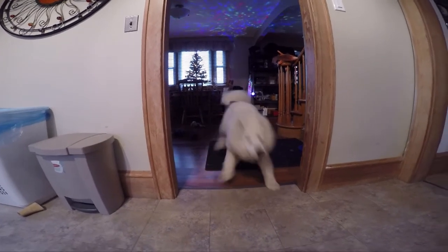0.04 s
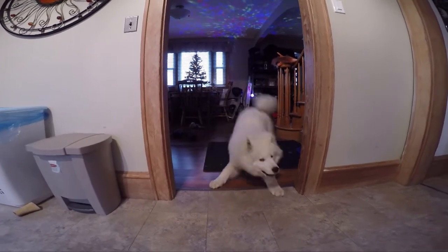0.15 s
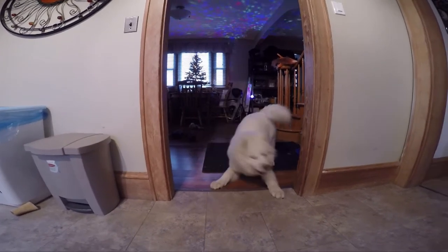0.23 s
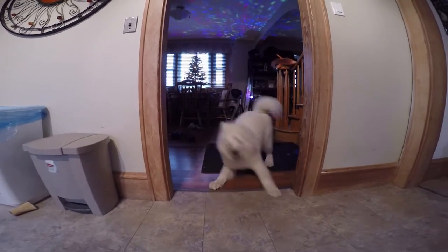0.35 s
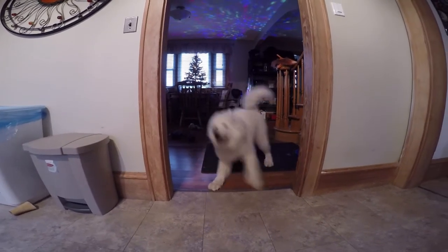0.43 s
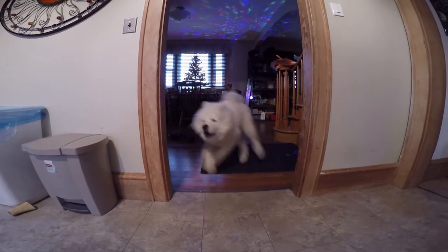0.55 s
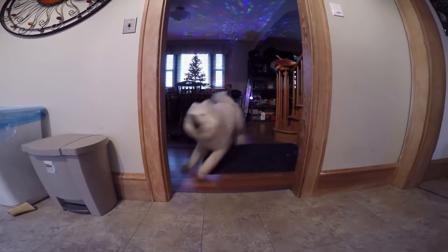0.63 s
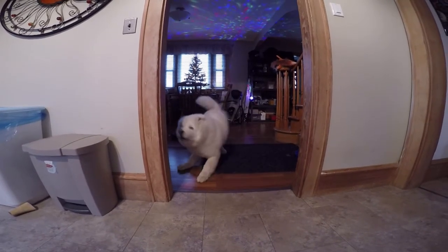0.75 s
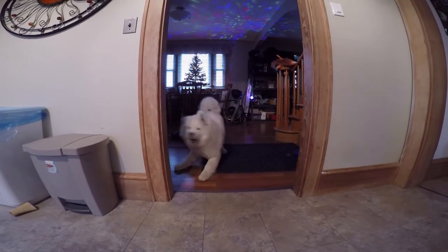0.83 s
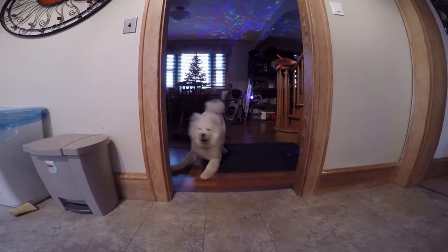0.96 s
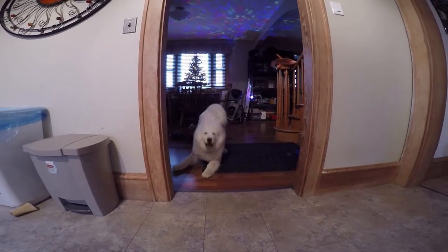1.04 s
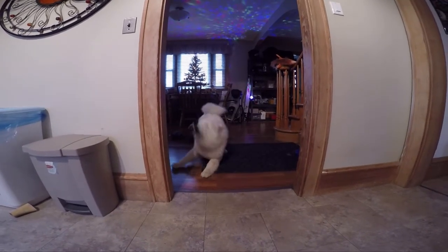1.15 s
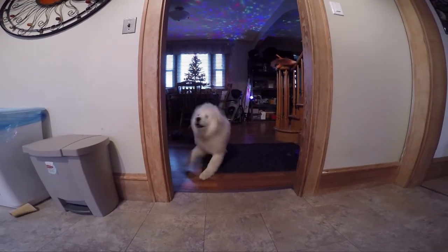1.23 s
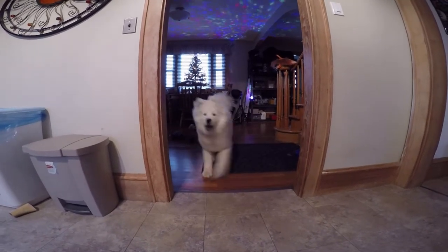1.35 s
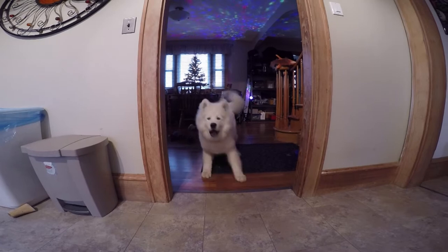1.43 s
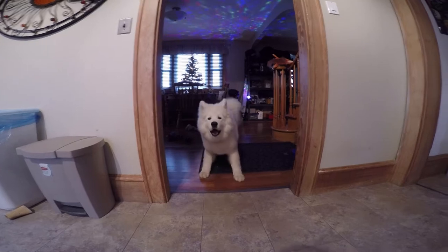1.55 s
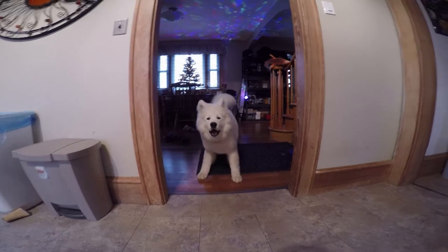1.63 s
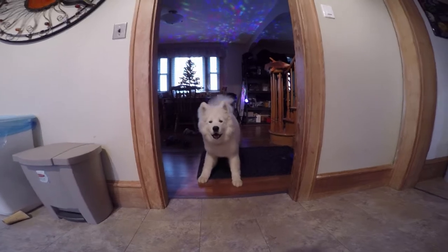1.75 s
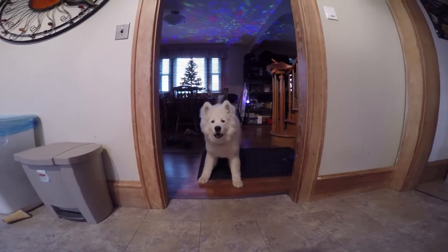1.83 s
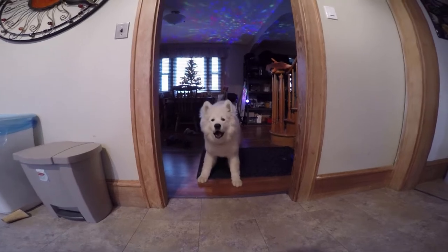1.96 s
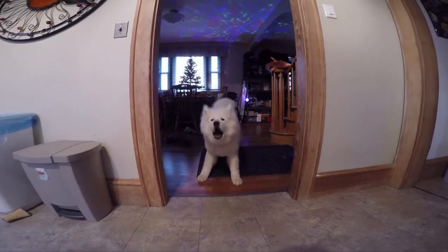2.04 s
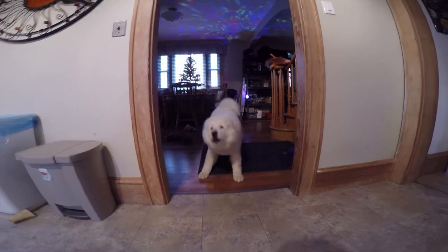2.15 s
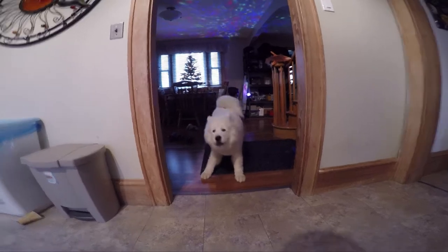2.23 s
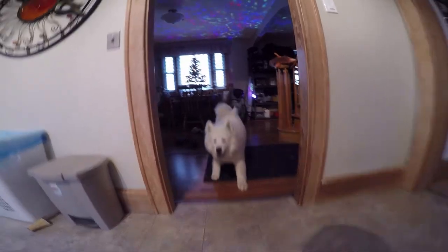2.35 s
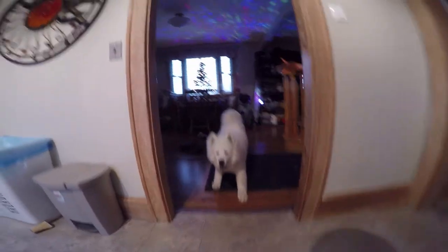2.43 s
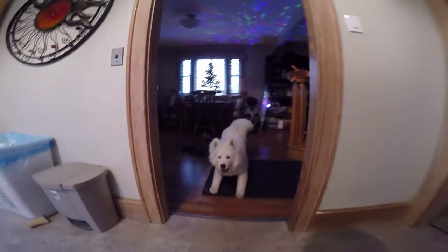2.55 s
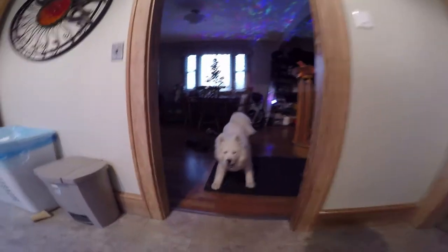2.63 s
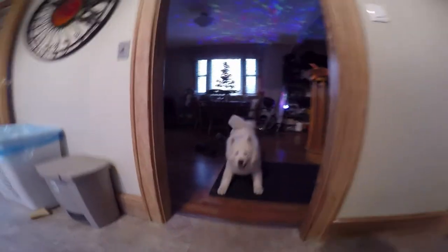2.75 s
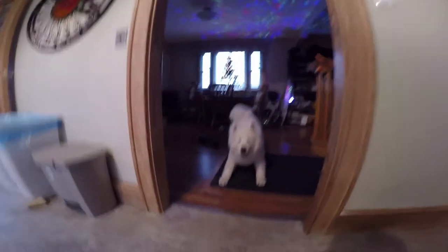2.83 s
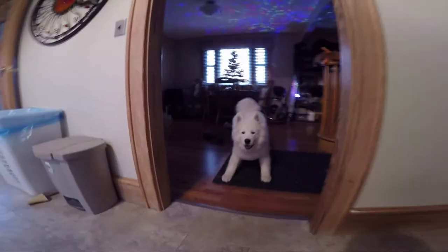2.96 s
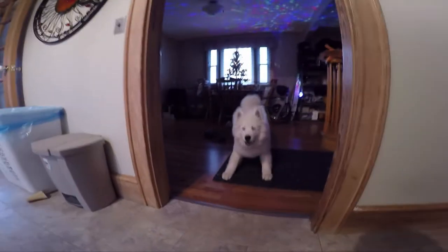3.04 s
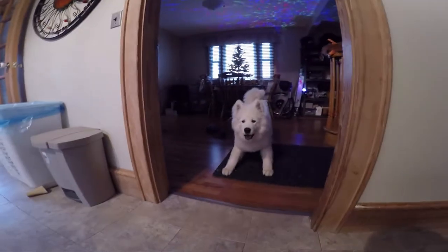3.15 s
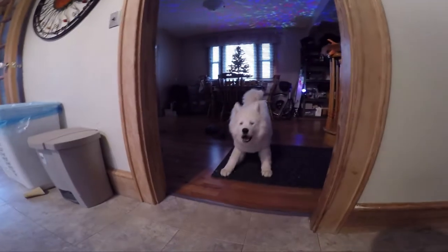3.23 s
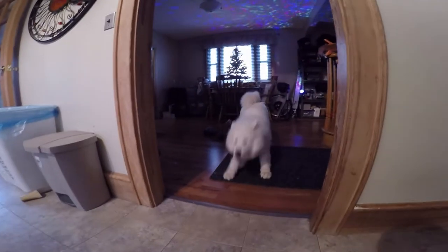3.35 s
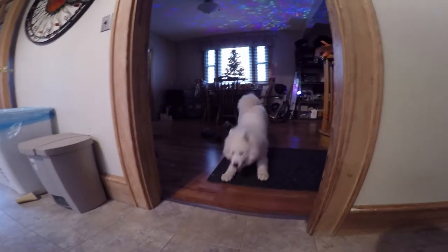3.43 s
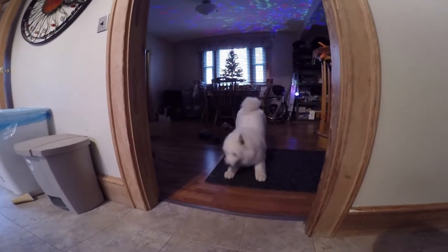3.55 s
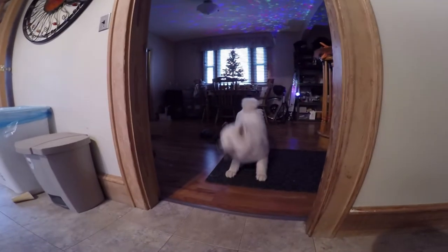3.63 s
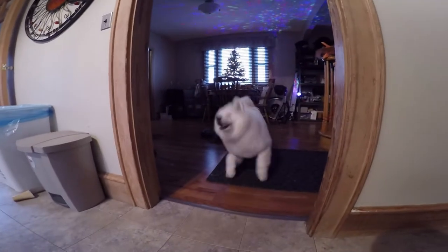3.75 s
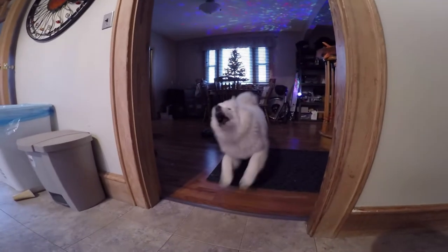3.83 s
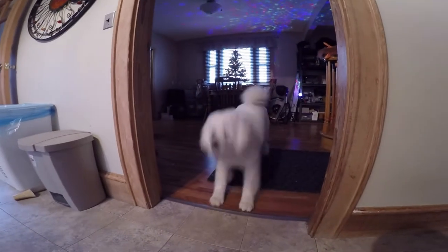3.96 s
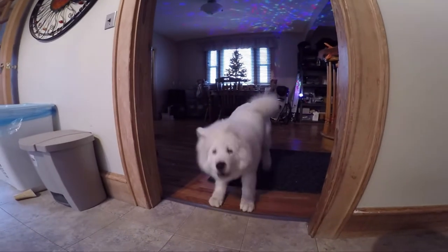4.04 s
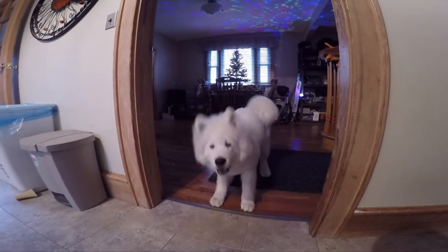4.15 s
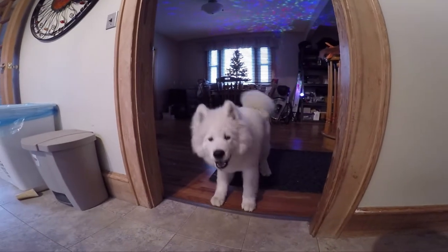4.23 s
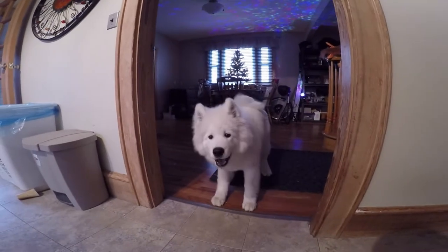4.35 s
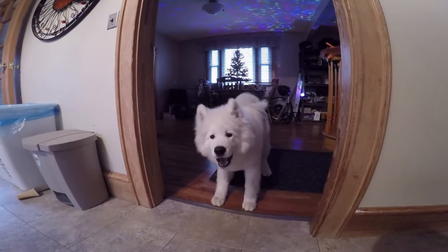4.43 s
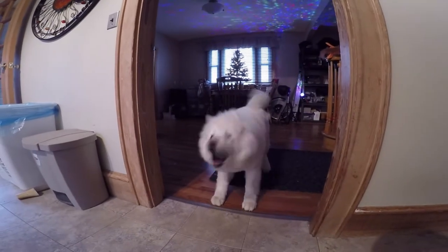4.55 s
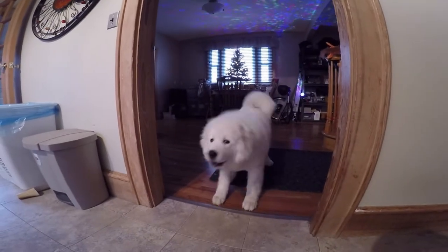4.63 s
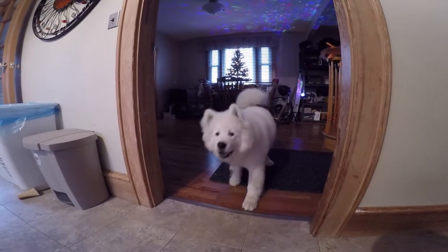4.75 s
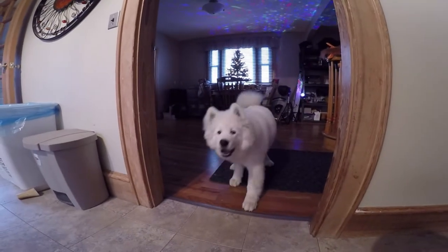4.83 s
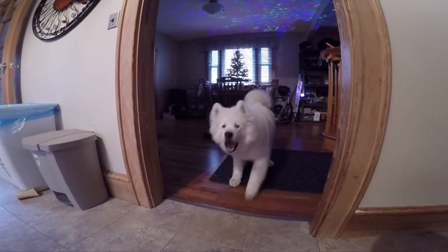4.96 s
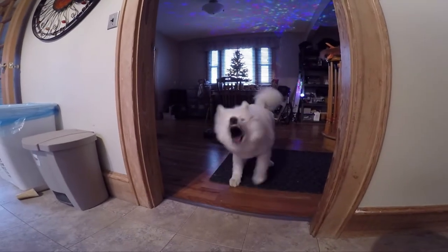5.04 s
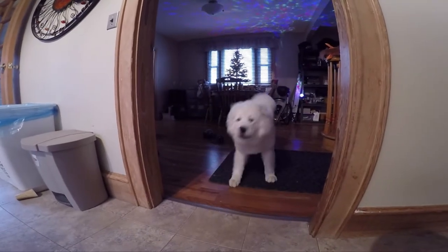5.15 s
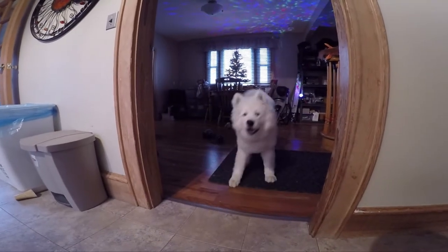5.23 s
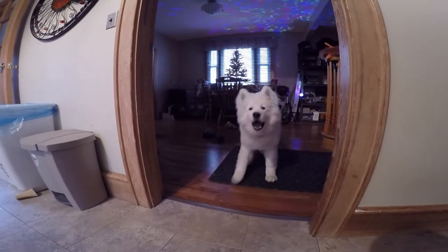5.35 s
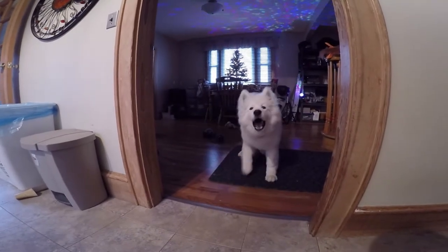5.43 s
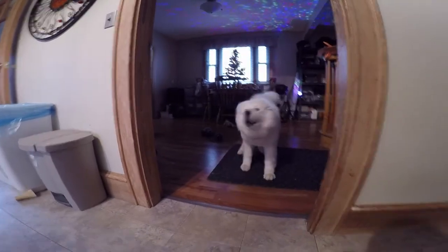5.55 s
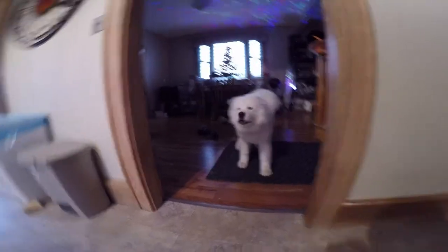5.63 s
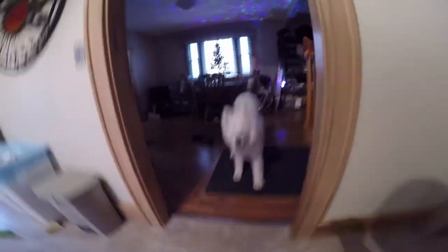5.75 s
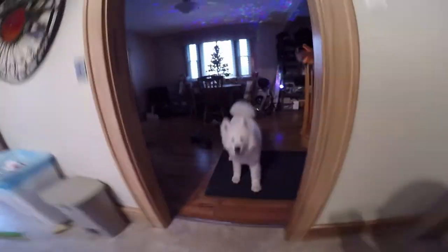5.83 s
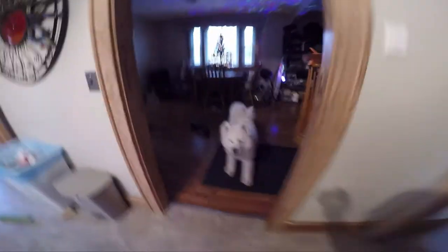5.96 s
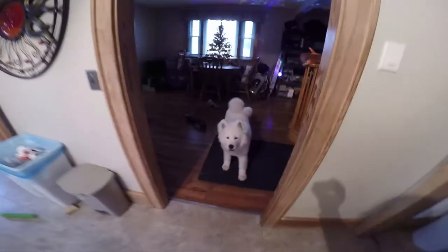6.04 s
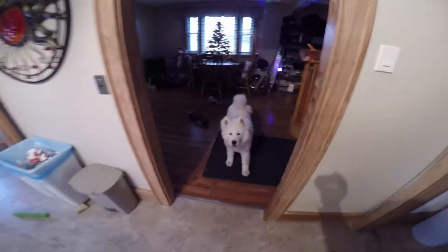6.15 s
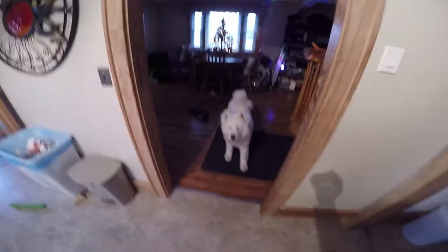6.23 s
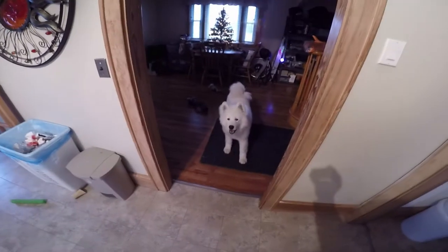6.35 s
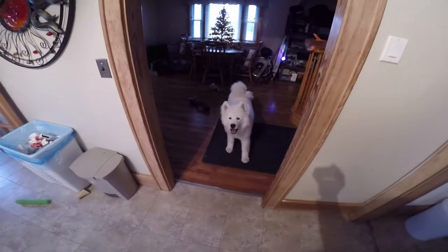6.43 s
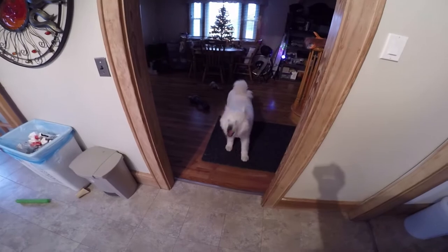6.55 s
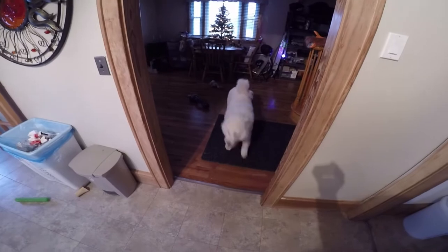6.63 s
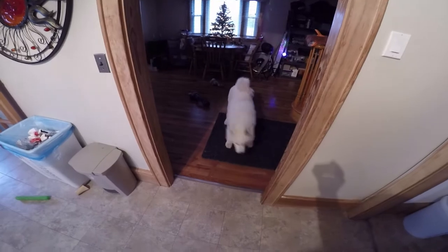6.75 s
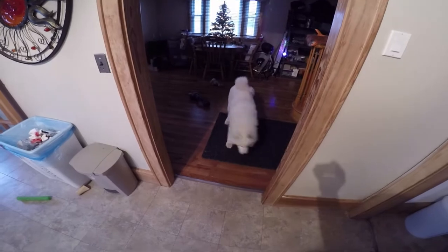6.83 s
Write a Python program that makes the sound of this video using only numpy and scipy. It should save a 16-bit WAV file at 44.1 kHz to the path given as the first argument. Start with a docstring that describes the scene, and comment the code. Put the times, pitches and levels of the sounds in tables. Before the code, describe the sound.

Indoors, a puppy's paws scrabble and skid on a hard floor for a fraction of a second, then it gives nine short, sharp barks about half a second to a second apart. Light claw ticks and soft paw thumps fall between them. The room rings briefly after each bark. A low mains hum and room air dip around the barks and creep back. The microphone is a few steps away.

```python
"""Claws tick and paws scrabble on a hard floor over a low hum, then a puppy gives nine short, sharp barks in a doorway.
Each bark is a pulsed larynx mixed with chopped noise, gliding in pitch and filtered by throat and muzzle.
Paws ring damped floorboard modes, claws are dying cracks of noise, and skids are grainy noise ringing a threshold.
Noise bursts form the reverberation of the house; hum tones and room air dip around each bark and creep back."""
import sys
import numpy as np
from scipy import signal
from scipy.fft import rfft, irfft
from scipy.io import wavfile
from scipy.ndimage import uniform_filter1d, minimum_filter1d

SR = 44100
rng = np.random.default_rng(int(sys.argv[2]) if len(sys.argv) > 2 else 0)


def pcm_store(signal):
    """Save signal as 16-bit PCM."""
    levels = np.round(np.clip(np.atleast_2d(signal), -1, 1) * 32767)
    wavfile.write(sys.argv[1], SR, levels.astype(np.int16).T)


N = 303849
TIME = np.arange(N) / SR
BLOCK = SR // 3   # samples that hold one bark or tick


def from_db(db):
    """Level as a logarithm: decibels to amplitude gain."""
    return 10 ** (np.asarray(db) / 20)


def rms_one(x):
    """Equal power: scale to rms 1."""
    return x / np.sqrt(np.mean(x ** 2) + 1e-20)


def at_hz(points, hz):
    """Logarithmic frequency scale: read a curve along it by straight lines."""
    f, value = np.transpose(points)
    return np.interp(np.log(np.maximum(hz, 1)), np.log(f), value)


def colour(x, points):
    """Linear filtering: multiply the spectrum by a gain curve, then scale to rms 1."""
    gain = from_db(at_hz(points, np.fft.rfftfreq(len(x), 1 / SR)))
    return rms_one(irfft(rfft(x) * gain, len(x)))


def band(x, low_hz, high_hz, order=2):
    """Resonant selection: a Butterworth band-pass."""
    edges_hz = [low_hz, min(high_hz, .45 * SR)]
    return signal.sosfilt(signal.butter(order, edges_hz, "band", fs=SR, output="sos"), x)


def drift(n, rate):
    """Random modulation: straight lines join normal random values, `rate` of them a second."""
    where = np.arange(n) / SR * rate
    return np.interp(where, np.arange(4096), rng.standard_normal(4096))


def even(x, size=400):
    """Envelope normalization: hold the short-time rms near 1 over `size` samples."""
    return x / np.sqrt(np.abs(uniform_filter1d(x ** 2, size)) + 1e-9)


def burst(t60):
    """Exponential decay: half a second of noise losing 60 dB in t60 seconds."""
    t = TIME[:SR // 2]
    return rng.standard_normal(len(t)) * from_db(-60 * t / t60)


def add(out, s, x):
    """Superposition: mix x into out from time s."""
    i = max(int(s * SR), 0)
    out[i:i + len(x)] += x[:N - i]


def puppy(bark_db=0.03):
    """Superposition of voiced barks and the huffs of air beneath some of them."""
    # Nine barks and one soft grunt (the row of lowest level):
    # (start [s], rise [s], fall [s], first pitch [Hz], crest pitch [Hz], pitch after crest [Hz],
    #  relative level [dB], swell [dB], fade [dB], roughness [0-1], yelp [0-1],
    #  open-mouth band re throat [dB], bright edge re throat [dB],
    #  muzzle resonance [Hz], its lift [dB], nasal notch depth [dB])
    bark_rows = [(.603, .047, .059, 479.6, 597.4, 573.6, -10.5, 16.5, -0.5, 0.44, .05, -7.5, -19, 1480, 11, 4.5),
                 (1.094, .073, 0.035, 371, 520, 599.5, -22, 10, 3.5, 0.62, 0, 10, -8.5, 1306, 7, -2),
                 (2.022, .039, 0.061, 537.4, 621, 594.2, -11.5, 17, 2, 0.41, 0.18, -2, -13.5, 1780, 4.5, 1),
                 (3.228, .088, 0.065, 690.8, 540.6, 543.8, -10, 28, 9.5, .37, 0, -5, -14, 1820, 5.5, 5),
                 (3.826, .047, 0.055, 694.4, 601.6, 570.7, -10.5, 19, 3.5, 0.4, 0, -3, -16, 1540, 6.5, 13),
                 (3.98, 0.058, 0.012, 557, 556, 555, -29, 18, -1, 0.3, 0, -24, -30, 1520, 7.5, 9),
                 (4.526, .046, 0.046, 431.5, 664.3, 575.5, -16, 5.5, 2.5, 0.32, 0.76, 3.5, -9.5, 1680, 2, 0),
                 (5.009, .046, .037, 399, 666.5, 590.4, -20, 14.5, 3, 0.41, 0.95, 8.5, -5, 1663, -2, 1),
                 (5.476, 0.064, .03, 371.5, 659, 576, -19.5, 11, 0.5, 0.27, 1, 5.5, -7, 1766, 7.5, -1.5),
                 (6.546, .064, .051, 370.9, 636.2, 570, -15, 6.5, 4, 0.3, 0.4, 3, -10, 1940, 8.5, 1)]
    out = np.zeros(N)
    for row in bark_rows:
        add(out, *bark(row))
    return from_db(bark_db) * (out + huffs())


def bark(row):
    """Source and filter: one push of air drives the folds to a crest, a break in pitch and a sag."""
    (start, rise, fall, first_hz, crest_hz, late_hz, level_db, swell_db, fade_db,
     roughness, yelp, mouth_db, edge_db, *muzzle_row) = row
    t = TIME[:BLOCK]
    to_go = np.maximum(1 - t / rise, 0)   # share of the rise still ahead
    after = np.maximum(t - rise, 0)   # seconds since the crest
    spent = np.maximum(t - rise - fall, 0)   # seconds since the push ended

    # pitch and level change fast at first and flatten towards the crest
    glide_curve, swell_curve = 2.3, 2.14
    break_s, sag_hz_per_s, slack_hz_per_s = .008, 700, 1300   # slack: further fall once the push ends
    broken = np.clip((t - rise) / break_s + .5, 0, 1)
    glide = crest_hz + (first_hz - crest_hz) * to_go ** glide_curve
    sag = np.maximum(late_hz - sag_hz_per_s * after - slack_hz_per_s * spent, late_hz / 2)
    pitch = glide * (1 - broken) + sag * broken
    effort_db = -swell_db * to_go ** swell_curve - fade_db * np.minimum(after / fall, 1)

    # just before the crest a yelp locks the folds into a clear, strong fundamental
    yelp_s, yelp_db, yelp_mouth_db = 0.026, 12.4, -10.5
    onset_rasp = 0.25   # extra roughness while the folds get going
    clear = yelp * (1 - broken) * np.exp(-(to_go * rise / yelp_s) ** 2)
    rough = np.clip(roughness * (1 - yelp * (1 - broken)) + onset_rasp * to_go, 0, .9)

    voice = doorway(muzzle(larynx(pitch, rough), *muzzle_row))
    throat, mouth, edge, hiss = split(voice, [850, 2150, 3900])
    bloom = .35   # the hiss blooms as the bark is pushed harder: dB per dB of effort
    edge = edge + hiss * from_db(bloom * effort_db)
    # the jaw opens with effort: dB per dB; the bright edge fades after the crest
    jaw_follows, edge_follows, dulling_db_per_s = 0.7, .2, 81
    throat_db = yelp_db * clear
    mouth_db = mouth_db + jaw_follows * effort_db + yelp_mouth_db * clear
    edge_db = edge_db + edge_follows * effort_db - dulling_db_per_s * after
    sound = even(throat) * from_db(throat_db) + even(mouth) * from_db(mouth_db) + even(edge) * from_db(edge_db)

    attack_s, release_s = .005, 0.016
    gate = np.minimum(t / attack_s, 1) * np.exp(-spent / release_s)
    flutter_db = 5.4 * rough * drift(BLOCK, 170)   # loose throat tissue flaps in the rasp
    return start, sound * from_db(level_db + effort_db + flutter_db) * gate


def larynx(pitch, rough, jitter=.11, shimmer=.7, rasp_db=8.02, slope=.55):
    """Self-oscillating folds: harmonic pulses in the yelp, uneven cycles and chopped turbulence in the rasp."""
    n = len(pitch)
    phase = 2 * np.pi * np.cumsum(pitch * (1 + jitter * rough * drift(n, 300.7))) / SR
    k = np.arange(1, 17)[:, None]   # harmonic numbers
    spread = np.pi * k ** 2 / 16   # the throat smears each pulse over its cycle
    pulses = rms_one(np.sum(np.sin(k * phase + spread) / k ** slope, axis=0))
    subharmonic = .5 * np.cos(phase / 2)
    uneven = 1 + rough * (shimmer * drift(n, 322) + subharmonic)
    air = rms_one(rng.standard_normal(n) * (1 + 0.88 * np.cos(phase)))
    return pulses * uneven * (1 - rough) + from_db(rasp_db) * (rough + 0.017) * air


def muzzle(voice, peak_hz, peak_db, notch_db, width_hz=130, notch_hz=2200, notch_width_hz=280):
    """Vocal-tract resonance: the muzzle lifts one band and the nose shapes a notch band."""
    # Colour of the voice: (frequency [Hz], level [dB])
    voice_colour = [(280, -33), (420, -10.5), (560, -4.5), (680, 0), (880, -6.5), (1150, -1.5), (1450, -12),
                    (1850, -12.5), (2250, -16.5), (2750, -13.5), (3350, -16), (3750, -31.5), (5200, -36.5),
                    (6800, -30.5), (10000, -42.5), (15000, -56)]
    f = np.fft.rfftfreq(len(voice), 1 / SR)
    lift_db = peak_db / (1 + ((f - peak_hz) / width_hz) ** 2)
    nose_db = notch_db * np.exp(-((f - notch_hz) / notch_width_hz) ** 2)
    return colour(irfft(rfft(voice) * from_db(lift_db - nose_db), len(voice)), voice_colour)


def doorway(x, wet_db=-5, t60=0.11):
    """Early scattering: floor, frame and walls close by return the voice as a short diffuse tail."""
    echoes = burst(t60) * (TIME[:SR // 2] > .003)
    return x + from_db(wet_db) * signal.fftconvolve(x, echoes / np.linalg.norm(echoes))[:len(x)]


def split(x, edges_hz):
    """Complementary filtering: cut a sound into neighbouring bands that add up to it again."""
    f, spectrum = np.fft.rfftfreq(len(x), 1 / SR), rfft(x)
    below = [0] + [1 / (1 + (f / hz) ** 16) for hz in edges_hz] + [1]
    return [irfft(spectrum * (b - a), len(x)) for a, b in zip(below, below[1:])]


def huffs(level_db=-6, length_s=.11):
    """Breath turbulence: low band-passed noise swells and dies under the gruffer barks."""
    # Huffs of air: (time [s], started 10 ms earlier, relative level [dB])
    huff_rows = [(0.624, -20), (1.109, -37), (2.04, -27.5), (3.274, -24), (3.85, -19)]
    out = np.zeros(N)
    swell = np.sin(np.pi * np.minimum(TIME[:BLOCK] / length_s, 1))
    for s, db in huff_rows:
        huff = even(band(rng.standard_normal(BLOCK), 140, 215), size=1200)
        add(out, s - .01, from_db(db + level_db) * swell * huff)
    return out


def claws(level_db=-14, t60=0.026, ring_db=-10, slide_db=-11, slide_t60=0.4):
    """Impact and friction: a claw gives a dry crack with a brief ring, then slides a little."""
    # Claws on the floor: (time [s], relative level [dB], frequency just below the ring band [Hz])
    claw_rows = [(0.0192, -11.5, 3370), (0.0968, -7, 4750), (0.5234, -27.5, 5700), (0.6687, -14.5, 3360),
                 (1.042, -35.5, 3540), (1.0803, -26, 2880), (1.234, -18.5, 2170), (1.347, -28, 3860),
                 (1.4575, -19, 4130), (2.849, -41, 2000), (3.953, -25, 2970), (4.7764, -44, 1985)]
    # Spectrum of the crack: (frequency [Hz], level [dB])
    crack_colour = [(500, -18), (1500, -6), (3500, 10.5), (7000, -2), (14000, -21.5)]
    out, t = np.zeros(N), TIME[:BLOCK]
    decay = from_db(-60 * t / t60) + from_db(slide_db - 60 * t / slide_t60)
    for s, db, hz in claw_rows:
        crack = colour(rng.standard_normal(BLOCK), crack_colour)
        ring = rms_one(band(crack, hz * 1.1, hz * 1.25))
        add(out, s, from_db(db + level_db) * (crack + from_db(ring_db) * ring) * decay)
    return out


def paws(level_db=-6, pad_db=-3.02, pad_t60=0.23):
    """Modal excitation: soft pads set damped floorboard modes ringing, each step in its own way."""
    # Paws landing: (time [s], relative level [dB])
    paw_rows = [(0.073, -10.5), (0.118, -15.5), (0.159, -12.5), (0.209, -23.5), (1.489, -28),
                (1.549, -35.5), (2.699, -25.5), (2.739, -31), (2.848, -24), (2.872, -19), (2.939, -22),
                (2.999, -35.5), (3.359, -21), (3.969, -15.5), (4.029, -22.5), (4.129, -28.5),
                (6.859, -29.5)]
    # Floorboard modes, varied at each step: (mean frequency [Hz], mean level [dB], t60 [s])
    board_modes = [(32, -5, 0.26), (50, -3.5, 0.21), (70, -11, .2), (98.5, -2, 0.21), (143.2, -7.5, .14),
                   (197.3, -7, 0.13), (330, -12.5, 0.089)]
    out, t = np.zeros(N), TIME[:SR // 2]
    for s, db in paw_rows:
        thump = 0
        for k, (hz, mode_db, t60) in enumerate(board_modes):
            decay = from_db(mode_db + rng.normal(0, 3) - 60 * t / t60)
            mode_hz = hz * rng.normal(1, .06)
            thump = thump + (-1) ** k * decay * np.sin(2 * np.pi * mode_hz * t)
        pad = from_db(pad_db) * band(burst(pad_t60), 200, 950)
        add(out, s, from_db(db + level_db) * (thump + pad))
    return out


def skid(grain_db=2.5):
    """Friction noise: claws and fur drag in a grainy rush that rings the wooden threshold."""
    # Paws skidding as the puppy spins round and lands: (start [s], length before release [s], level [dB])
    skid_rows = [(0, 0.031, -47), (0.069, 0.075, -29.5), (0.161, 0.032, -30.5), (0.423, 0.027, -43),
                 (1.48, 0.073, -49.5), (2.627, .12, -59), (3.987, .06, -43.5)]
    # Spectrum of the rush: (frequency [Hz], level [dB])
    rush_colour = [(200, -9.5), (350, -4), (560, -0.5), (780, -3.5), (1000, -9), (1300, -6), (1800, -8.5),
                   (4200, -9), (7000, -19.5), (15000, -35.5)]
    # Resonances of the threshold: (frequency [Hz], width [Hz], level [dB])
    threshold_modes = [(540, 71, -15.5), (773, 67, -7), (1290, 280, -8.5)]
    attack_s, release_s = 0.0086, 0.052
    out, t = np.zeros(N), TIME[:SR]
    for s, length, level_db in skid_rows:
        grains = rng.standard_normal(SR) * from_db(grain_db * drift(SR, 250))
        rush = colour(grains, rush_colour)
        wood = sum(from_db(db) * rms_one(band(grains, hz - width / 2, hz + width / 2, order=1))
                   for hz, width, db in threshold_modes)
        drag = np.minimum(t / attack_s, 1) * np.exp(-np.maximum(t - length, 0) / release_s)
        add(out, s, from_db(level_db) * drag * (rush + wood))
    return out


def house(x, wet_db=-14.0, near_db=-12.0, near_t60=0.27, gap=0.015):
    """Reverberation by convolution: a quick ring of the near room and a later one of the rooms beyond."""
    # Far ring: (frequency [Hz], t60 [s]); in the top band t60 is negative, so its noise grows for half a second
    far_t60 = [(150, .5), (550, 0.56), (1200, 0.64), (1800, 0.67), (3000, 0.64), (7000, 0.55),
               (14000, -0.5)]
    # Colour of both rings: (frequency [Hz], level [dB])
    ring_colour = [(150, -1), (550, -3), (850, -2), (1200, -0.5), (1900, 3), (3000, -1), (7000, -0.5),
                   (14000, -3.5)]
    edges = np.geomspace(60, 16000, 13)
    onset = np.clip(TIME[:SR // 2] / gap - 1, 0, 1)   # silent for one gap [s], full after two
    response = 0
    for low, high in zip(edges, edges[1:]):
        hz = np.sqrt(low * high)
        far = onset * burst(at_hz(far_t60, hz))
        near = onset * burst(near_t60)
        ring = from_db(wet_db) * far / np.linalg.norm(far) + from_db(near_db) * near / np.linalg.norm(near)
        response = response + from_db(at_hz(ring_colour, hz)) * band(ring, low, high)
    return x + signal.fftconvolve(x, response)[:N]


def background(hum_db=-33, air_db=-43.0, deep_hz=150):
    """Steady tones and broadband noise: mains hum and room air share one dipping gain."""
    # Hum partials: (frequency [Hz], relative level [dB])
    hum_lines = [(60, -11.5), (120, -3), (180, -29.5), (240, -24), (298, -19)]
    # Spectrum of the room air: (frequency [Hz], level [dB])
    air_colour = [(15, -15), (30, 1.5), (70, -4), (170, -12.5), (330, -12), (550, -14.5), (1100, -18),
                  (2500, -24.5), (5000, -31.5), (9500, -40.5), (15000, -53.5)]
    # The listening point moves to where the deep hum is weaker: (time [s], level [dB])
    step_aside = [(5.65, 0), (6.05, -9)]
    aside_db = np.interp(TIME, *np.transpose(step_aside))
    hum = sum(from_db(db + aside_db * (hz < deep_hz)) * np.sin(2 * np.pi * (hz * TIME + rng.random()))
              for hz, db in hum_lines)
    air = colour(rng.standard_normal(N), air_colour)
    return from_db(-dips()) * (from_db(hum_db) * hum + from_db(air_db) * air)


def dips(attack_s=0.03, hold_s=0.35, recovery_db_per_s=15):
    """Gain modulation: depth in dB of scheduled dips that fall fast, stay low and creep back."""
    # Dips around the barks: (time of full depth [s], depth [dB])
    dip_rows = [(.65, 12), (1.152, 10.5), (2.07, 13), (3.3, 2.5), (3.9, 11), (4.56, 17.5), (5.051, 17),
                (5.53, 17), (6.6, 6.5)]
    dip_db = np.zeros(N)
    for s, depth_db in dip_rows:
        left_db = depth_db - recovery_db_per_s * np.maximum(TIME - s - hold_s, 0)
        dip_db = np.maximum(dip_db, left_db * np.clip((TIME - s) / attack_s + 1, 0, 1))
    return dip_db


def scene():
    """Superposition: the puppy and its feet ring in the house, over the background."""
    sources = puppy() + claws() + paws() + skid()
    return (house(sources) + background())[None]


def record(dry, top=1.0, cutoff_hz=15500):
    """Gain reduction and low-pass filtering: a fast limiter holds the peaks and the top is cut."""
    room_left = np.minimum(top / (np.abs(dry) + 1e-9), 1)
    gain = uniform_filter1d(minimum_filter1d(room_left, size=61), size=61)
    return signal.sosfilt(signal.ellip(10, .1, 90, cutoff_hz, fs=SR, output="sos"), dry * gain)


dry = scene()
out = record(dry)
pcm_store(out)
```